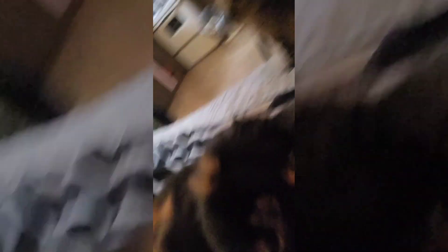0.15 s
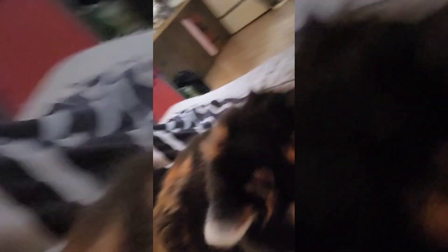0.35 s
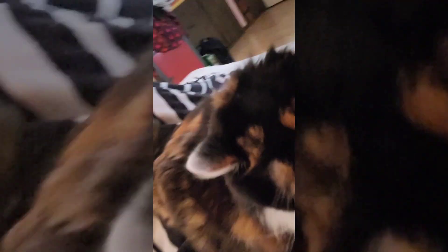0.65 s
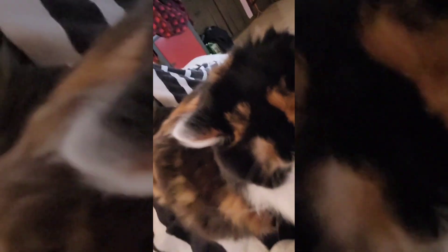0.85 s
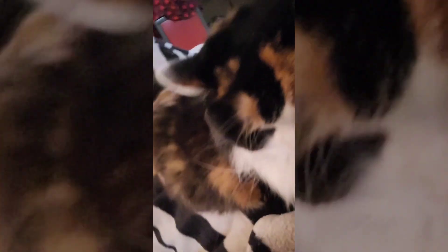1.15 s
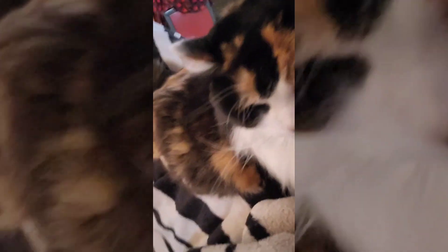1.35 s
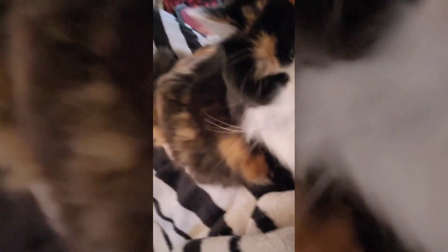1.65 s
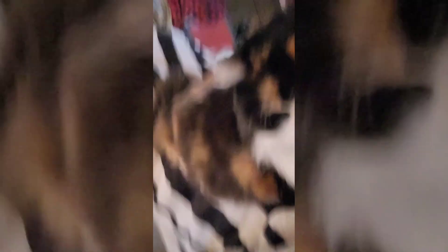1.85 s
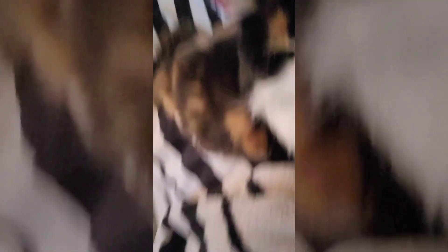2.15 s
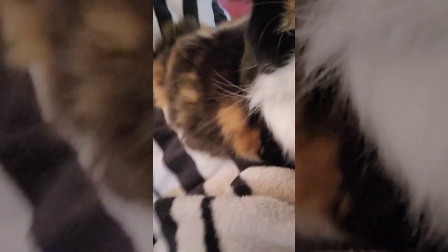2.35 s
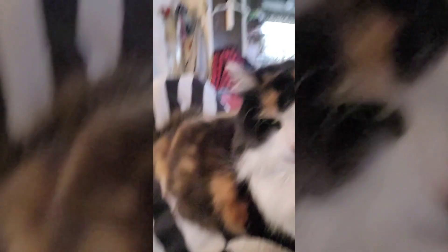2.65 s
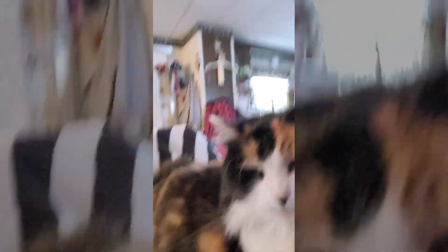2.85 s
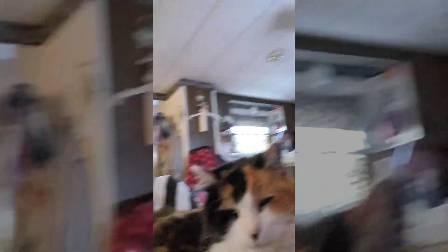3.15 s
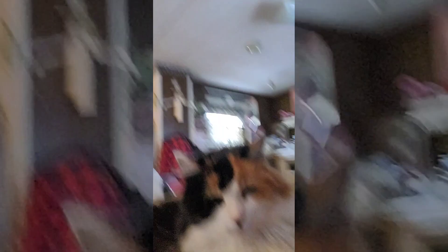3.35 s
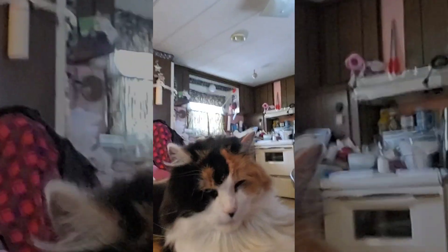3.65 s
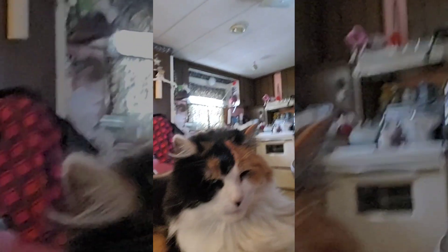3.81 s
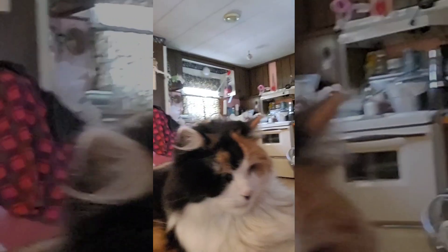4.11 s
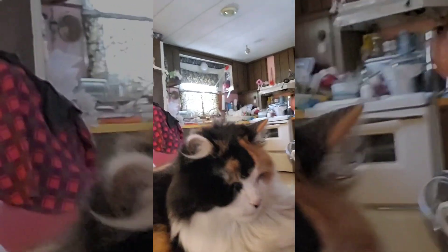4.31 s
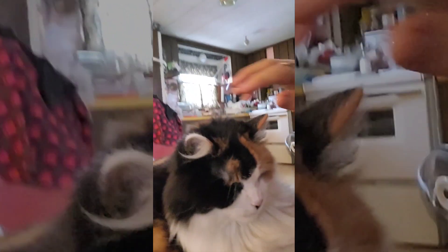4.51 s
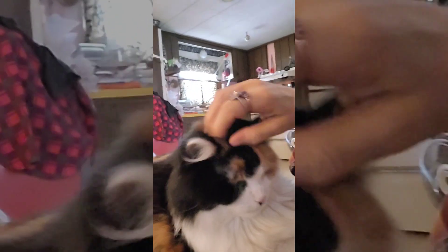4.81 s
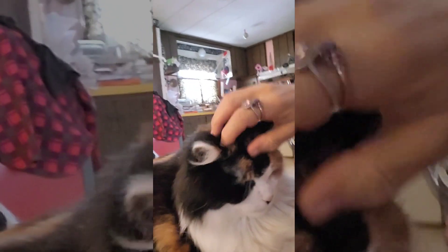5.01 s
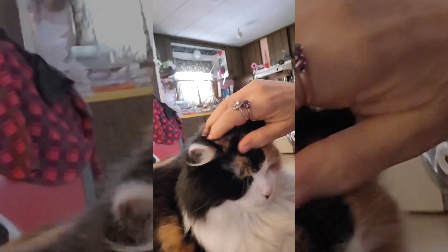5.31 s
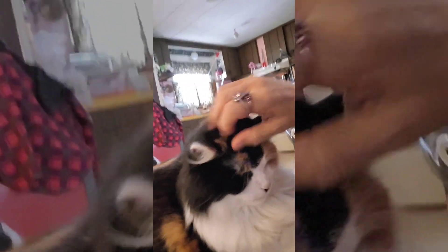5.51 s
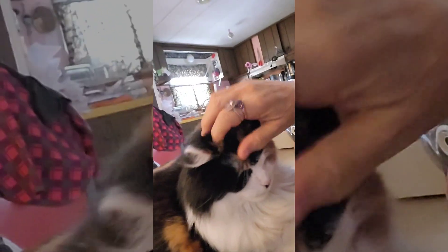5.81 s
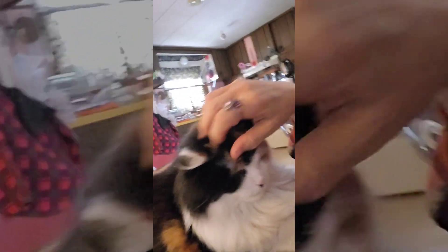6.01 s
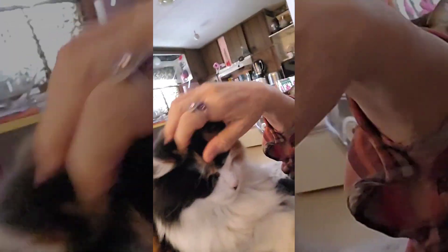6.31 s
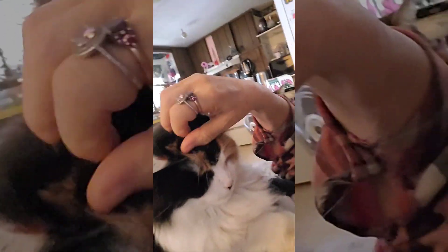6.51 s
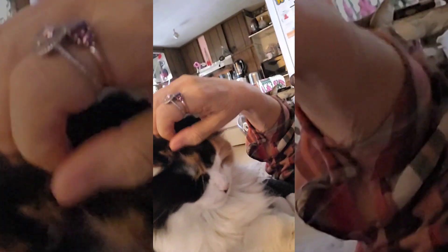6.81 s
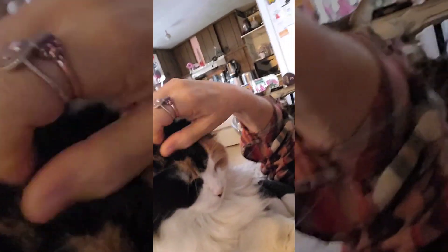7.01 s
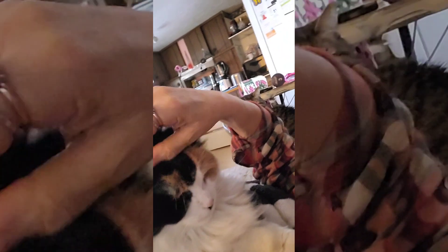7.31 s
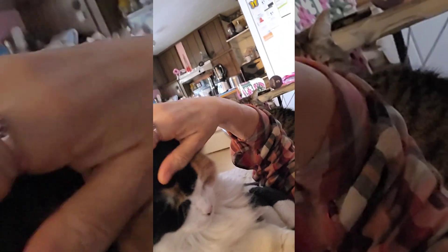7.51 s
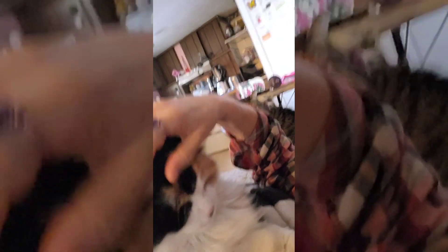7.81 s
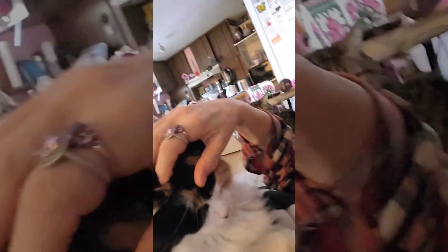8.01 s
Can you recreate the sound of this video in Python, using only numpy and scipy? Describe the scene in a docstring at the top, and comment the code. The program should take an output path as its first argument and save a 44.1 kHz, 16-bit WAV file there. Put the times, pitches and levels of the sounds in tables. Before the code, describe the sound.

Loud bumps and rustling from a moved microphone give way to a close, crackly cat purr with soft fur scratching in a quiet kitchen.

```python
"""A quiet kitchen: a cat purrs on a blanket close to a hand-held recorder with a left and a right port.
At first the recorder is moved: ringing bursts knock its case and shaped noise rubs cloth on it.
Later the purr is bare: noise flutters through chest, mouth and nose, and impulses click in chest and mouth.
Noise puffs mark the turns of breath, a gliding sine whistles in the nose, and fingers scratch fur.
Behind it all lies uneven noise from the house and the microphones."""
import sys
import numpy as np
from scipy import signal
from scipy.fft import rfft, irfft, next_fast_len
from scipy.io import wavfile
from scipy.ndimage import map_coordinates

SR = 44100
rng = np.random.default_rng(int(sys.argv[2]) if len(sys.argv) > 2 else 0)


def to_wav(s):
    """Save 16-bit WAV."""
    ch = np.atleast_2d(s).T  # columns
    pcm = np.round(np.clip(ch, -1, 1) * 32767)  # PCM
    wavfile.write(sys.argv[1], SR, pcm.astype(np.int16))


N = 359856

# Levels in the tables are drives in dB, ahead of any filter or port balance in the functions.

# Purr phrases. Each row: start in seconds, length in seconds, chest level in dB at the start,
# chest level in dB at the end, nose level in dB, share of the upper nose resonance (0-1).
PURR_PHRASES = [(3.264, 0.29, -68, -57, -84.5, 0.5), (3.732, 0.25, -57, -85, -99.5, 0.45),
                (4.2, 0.52, -54, -57, -73, 0.71), (4.799, 0.11, -62.5, -69, -83, .4),
                (5.06, 0.25, -55.5, -69, -74.5, 1), (5.401, 0.068, -68, -63.5, -78.5, 0.85),
                (5.626, 0.25, -67, -73.5, -79.5, 0.3), (6.149, 0.374, -57.5, -59.5, -72.5, 0.2),
                (6.878, 0.63, -67.5, -65.5, -85.5, 0.4), (7.53, 0.21, -62, -63.5, -89, 0),
                (7.738, 0.41, -51, -58, -69.5, 0.45)]
# Sharp closures of the throat. Each row: time in seconds, mouth level in dB, chest level in dB.
THROAT_CLICKS = [(3.586, -37, -24), (3.735, -40.5, -28.5), (4.224, -53, -20), (4.251, -23, -8.5),
                 (4.345, -38, -30), (4.45, -36.5, -29.5), (4.514, -36, -35), (4.945, -39, -31.5),
                 (5.059, -50, -24), (5.08, -44, -23.5), (5.094, -24.5, -15), (5.111, -32.5, -26),
                 (5.143, -35, -21.5), (5.176, -35, -20.5), (5.235, -51, -21), (5.264, -55, -34),
                 (5.297, -55, -38.5), (5.483, -51.5, -27.5), (5.548, -46, -28.5), (5.626, -41, -39),
                 (6.147, -37.5, -25), (6.177, -46, -18.5), (6.249, -30, -14.5), (6.376, -39, -24),
                 (6.509, -38.5, -24.5), (6.775, -38, -44), (6.908, -41.5, -27), (6.967, -44, -37),
                 (6.996, -42, -30.5), (7.148, -44, -34.5), (7.185, -38, -27.5), (7.203, -33.5, -23),
                 (7.267, -38.5, -25), (7.389, -35, -26), (7.418, -33, -23.5), (7.635, -38, -24.5),
                 (7.737, -55, -20.5), (7.77, -36, -15), (7.805, -30, -25), (7.865, -31, -15.5),
                 (7.905, -45, -19), (7.963, -33.5, -17.5), (8, -49, -20), (8.037, -40, -23),
                 (8.097, -34.5, -31)]
# Purr carried through the blanket into the case. Each row: time in seconds, level in dB.
BLANKET_TOUCH = [(3.2, -64.5), (3.7, -56), (4.1, -65), (4.7, -65.5), (5.1, -67.5)]
# Resonances of the cat's chest, mouth and nose. Each row: centre in Hz, width in Hz, level in dB.
CHEST_MODES = [(161.5, 180, -10), (286, 77.5, 1.5), (457.2, 141.6, -6)]
MOUTH_MODES = [(1090, 260, 0), (1750, 300, -8), (2600, 900, -16)]
NOSE_MODES = [(4390, 230, 0), (5084, 890, 0)]
# Turns of the cat's breath. Each row: start in seconds, length in seconds, level in dB,
# lower airway resonance in Hz, upper airway resonance in Hz.
BREATH_PUFFS = [(3.82, 0.076, -64, 1040, 2000), (4.729, 0.064, -69.5, 1021, 1660),
                (5.64, 0.089, -70.5, 1610, 2170), (6.551, 0.058, -66.5, 1000, 1650),
                (7.464, 0.09, -70, 1600, 2010)]
# Whistle in the cat's nose. Each row: time in seconds, pitch in Hz, level in dB.
NOSE_WHISTLE = [(5.52, 8000, -80.5), (5.562, 8679, -81.5), (5.66, 8280, -74.5), (5.86, 8480, -83.5),
                (5.97, 8124, -89)]
# Colour of the puff. Each row: frequency in Hz, density in dB per Hz.
PUFF_SPECTRUM = [(500, 2.5), (1000, 1), (1700, -7), (3000, -4.5), (4500, -2.5), (6500, -17), (10000, -24)]
# Fingers through fur. Each row: centre of the stroke in seconds, level in dB.
FUR_STROKES = [(4.612, -70.5), (4.712, -69), (4.947, -76), (5.182, -70), (5.369, -72.5), (5.479, -69),
               (5.63, -66.5), (5.778, -68), (5.993, -68), (6.139, -74), (6.279, -64.5), (6.415, -67.5),
               (6.553, -63.5), (6.825, -64.5), (7.098, -68), (7.263, -74), (7.372, -68), (7.542, -74),
               (7.684, -72), (7.801, -65), (7.946, -62.5), (8.078, -74)]
# Colour of the fur. Each row: frequency in Hz, density in dB per Hz.
FUR_SPECTRUM = [(1500, -26), (4000, -11), (7500, -3), (10500, -12), (14000, -2.5), (15500, -2)]
# Knocks on the case. Each row: time in seconds, crack level in dB, body level in dB,
# treble level in dB, share of the upper body mode (0-1).
CASE_KNOCKS = [(0.063, -58, -24, -67, 0.76), (0.105, -75, -27, -75, 0), (0.803, -69, -31.5, -75, 0.3),
               (0.441, -42.5, -27.5, -50, 0), (1.149, -61.5, -33, -62.5, 0.3), (1.787, -63, -35, -76, 0.75),
               (0.16, -77, -31.5, -42, 0.6), (0.194, -46, -36, -42.5, 0.63),
               (0.317, -19.5, -8, -17.5, 0.28), (0.399, -17.5, -11.5, -17, 0.85),
               (0.551, -21, -8, -29.5, 0.84), (0.57, -47.5, -21.5, -58.5, 0.4),
               (0.636, -34.5, -20, -52.5, 0.6), (0.67, -36.5, -11, -42, 0.65),
               (0.762, -45.5, -22.5, -48, 0.37), (0.879, -47, -40, -54, 0.78),
               (0.914, -43.5, -15.5, -65, 0.13), (0.973, -36.5, -19.5, -77, 0.66),
               (1.018, -33.5, -15, -25.5, 0.96), (1.081, -32.5, -12.5, -39, 0.2),
               (1.184, -19.5, -8, -26.5, 0.17), (1.192, -32, -3.5, -21.5, 1),
               (1.329, -28.5, -12.5, -27, 0.51), (1.352, -41.5, -19, -55.5, 0.6),
               (1.407, -43.5, -27.5, -43.5, 0.36), (1.418, -42, -28, -67, 0.3),
               (1.486, -38.5, -18, -36, 0.52), (1.629, -39, -23.5, -44.5, 0.6),
               (1.66, -24, -11.5, -34, 0.6), (1.698, -38.5, -19, -27, 1), (1.871, -28.5, -15, -28.5, 0.82),
               (1.881, -15.5, -4.5, -23.5, 0.26), (2.041, -30.5, -7.5, -30, 0.22),
               (2.064, -40, -13, -60, 0.7), (2.206, -35.5, -13.5, -49, 0.71),
               (2.262, -32.5, -18.5, -32.5, 0.83), (2.326, -34, -13, -30.5, 0.28),
               (2.568, -33, -20.5, -35.5, 0.48), (2.675, -28.5, -19.5, -37.5, 1),
               (2.981, -39, -19.5, -51, 0.6), (3.066, -32, -20.5, -44, 0.78), (3.151, -70, -22, -83, 0.78),
               (3.432, -29.5, -15, -59, 1), (0.711, -56, -29, -61, 0.7), (2.834, -54.5, -32, -66, 0.03)]
# Low modes of the case, strong at the left port. Each row: frequency in Hz, 60 dB decay in seconds.
BODY_MODES = [(292, 0.036), (460, 0.033)]
# Resonances of the case and of the ports. Each row: centre in Hz, width in Hz, level in dB.
CASE_MODES = [(530, 300, 7), (1047, 250, 8.5), (1800, 640, 2.5), (2410, 3200, -9)]
PORT_MODES = [(3640, 1100, -5.5), (4750, 590, 1), (5800, 1200, -7), (8000, 1300, -6.5)]
# Cloth dragged over the case. Each row: start in seconds, end in seconds, thud level in dB,
# rasp level in dB, fizz level in dB, left-right difference of rasp and fizz in dB.
CLOTH_SCRAPES = [(0.226, 0.366, -43, -58, -49.5, -6), (0.382, 0.417, -40.5, -58, -60, -9),
                 (1.173, 1.239, -43, -59, -63, -1), (1.32, 1.453, -58, -67.5, -79.5, -10),
                 (1.83, 1.962, -63, -47.5, -57.5, -5), (1.917, 1.987, -38.5, -46, -57, -14),
                 (2.044, 2.067, -27.5, -44, -42.5, -6), (2.176, 2.227, -52, -46.5, -49.5, 1),
                 (2.286, 2.323, -38.5, -57.5, -69, -16), (2.323, 2.343, -36.5, -41, -39.5, -8),
                 (2.386, 2.491, -50, -49, -69.5, -30), (2.49, 2.586, -70, -55, -65.5, -25),
                 (2.59, 2.592, -38.5, -43, -56, -7), (2.69, 2.776, -38, -53.5, -68, -8.5),
                 (2.896, 3.009, -48.5, -67, -66.5, -8), (3.048, 3.198, -52, -69.5, -84, -4),
                 (3.414, 3.533, -67, -67.5, -71.5, -6)]
# Light contact between scrapes. Each row: time in seconds, thud level in dB, rustle level in dB.
LIGHT_RUB = [(0, -39.5, -41.5), (.7, -53, -73), (1.5, -48.5, -64), (2.05, -52.5, -62.5),
             (2.6, -44.5, -55.5), (2.9, -51, -63), (3.2, -59.5, -83.5), (4.8, -64.5, -84)]
# Brief dips in the level of the light rub. Each row: centre in seconds, half length in seconds.
RUB_DIPS = [(0.108, 0.11), (0.846, 0.018), (1.302, 0.024), (1.776, 0.032), (3.225, 0.025)]
# Air pumped at the ports by the moving hand. Each row: time in seconds, level in dB.
HAND_SWAY = [(0, -52.5), (1.7, -64), (2.1, -50.5), (2.8, -55.5), (3.3, -69.5), (4.6, -63), (5.3, -72),
             (8.16, -76.5)]
# Colour of that air. Each row: frequency in Hz, density in dB per Hz.
SWAY_SPECTRUM = [(20, -12.5), (55, -3.5), (110, -3.5), (200, -13), (400, -48.5)]
# Colours of the rasp and the fizz of cloth. Each row: frequency in Hz, density in dB per Hz.
RASP_SPECTRUM = [(500, -2.5), (900, -1), (2000, -10), (3600, -7), (5000, -12), (6500, -28.5), (9000, -44)]
FIZZ_SPECTRUM = [(4000, -33.5), (6000, -10.5), (7800, -1), (9500, -13), (12000, -21), (15500, -6.5)]
# Background level. Each row: time in seconds, level in dB.
BACKGROUND_LEVEL = [(0, -76), (3.2, -65.5), (4.1, -67.5), (4.7, -65.5), (8.16, -63)]
# Colour of the background. Each row: frequency in Hz, density in dB per Hz.
ROOM_SPECTRUM = [(20, -15.5), (58, 2.5), (130, -9.5), (300, -10.5), (550, -22), (900, -27), (2000, -29),
                 (4300, -30), (5800, -34.5), (7800, -27.5), (10500, -35), (14500, -30.5)]
# Likeness of the ports in the room. Each row: frequency in Hz, left-right correlation.
ROOM_LIKENESS = [(60, 0.93), (200, 0.18), (600, 0.0033)]
# Treble balance of the ports. Each row: frequency in Hz, left-right difference in dB.
PORT_BALANCE = [(5000, 1.5), (8000, -16.5), (12000, 5)]

# Purr
CLOSURES_HZ = 30.5  # usual beat of the throat, rounded to fit between sharp closures
JITTER_S, CLOSE_S = 0.0025, 0.005  # scatter of the closures, rise time of one flutter
ATTACK_S, RELEASE_S = 0.014, 0.098  # phrase fade in, and time of a 20 dB fall after the phrase
LEAK, LEAK_GROWS = 0.27, 0.2  # flutter between closures at -60.5 dB chest, dB more per dB gentler
SHARP_SNAP_DB = 32.5  # chest level of a sharp closure, over the purr, that leaves its flutter unchanged
FLUTTER_FOLLOWS = 0.46  # dB of flutter per dB of sharp closure above or below that level
SNAP_DB, SNAP_CHEST_DB, SNAP_SCATTER_DB = -6, 12, 3.5  # plain snaps against the purr: mouth, chest, scatter
REBOUND_S, REBOUND_DB = 0.0085, -7  # the folds bounce and strike once more
AIRWAY_WIDTH_HZ = 170  # width of the puff resonances

# Handling
SHOVE_DB = -30.5  # push of the whole case, against the body level
SHEEN_MODE = (13700, 8500, 0)  # top of a knock: centre Hz, width Hz, dB
SHEEN_DB, SHEEN_GROWS = -15, 0.35  # against a treble of -25 dB, and extra dB per dB of treble
DIP_DB = -21  # level at the middle of a dip, against the light rub
SCRAPE_FADE_S = 0.018  # the cloth settles after a scrape
CRACKLE_PER_S, CRACKLE_DB = 260, -3.5  # single threads snapping, against the rasp

# Band limits
HISS_TOP_HZ = 15500
TOP_HZ, EDGE_HZ = 16530, 500  # end and width of the final roll-off


def amp(db):
    """Amplitude for a level in dB."""
    return 10 ** (np.asarray(db) / 20)


def unit(x):
    """x scaled to an rms of 1 along time."""
    return x / np.sqrt(np.mean(x ** 2, axis=-1, keepdims=True) + 1e-20)


def along(points, hz):
    """Value at hz between (Hz, value) points on a log frequency axis."""
    f, v = np.transpose(points)
    return np.interp(np.log(hz + 1), np.log(f + 1), v)


def curves(rows, outside=-120):
    """One value per sample for each column after the time; the outside value beyond the rows."""
    s, *cols = np.transpose(rows)
    return [np.interp(np.arange(N) / SR, s, c, outside, outside) for c in cols]


def wobble(rate):
    """A smooth random curve for each port, with rate knots a second."""
    knots = rng.standard_normal((2, int(N * rate / SR) + 4))
    steps = np.arange(0, N + 16, 16)
    smooth = [map_coordinates(k, [steps * rate / SR]) for k in knots]
    return np.array([np.interp(np.arange(N), steps, curve) for curve in smooth])


def filtered(x, response):
    """x through a complex response of frequency."""
    m = next_fast_len(N + SR // 4)
    return irfft(rfft(x, m) * response(np.fft.rfftfreq(m, 1 / SR)), m)[..., :N]


def resonant(x, *stages):
    """x through sets of causal resonances in turn, each scaled so that white noise keeps its rms."""
    def shape(f, modes):
        total = 0
        for k, (centre, width, db) in enumerate(modes):
            sign = (-1) ** k  # neighbours alternate in polarity
            total = total + sign * amp(db) * 1j * f * width / (centre * centre - f * f + 1j * f * width)
        return total

    grid = np.linspace(0, SR / 2, 4096)
    scale = np.prod([np.sqrt(np.mean(abs(shape(grid, modes)) ** 2)) for modes in stages])
    return filtered(x, lambda f: np.prod([shape(f, modes) for modes in stages], axis=0) / scale)


def hiss(spectrum):
    """Unrelated noise at each port, rms 1, with no energy over the top of the hiss."""
    noise = rng.standard_normal((2, N))
    return unit(filtered(noise, lambda hz: amp(along(spectrum, hz)) * (hz < HISS_TOP_HZ)))


def panned(db):
    """Gains of the two ports for a left-right difference."""
    return amp(np.array([db / 2, -db / 2]))


def purr():
    """The throat shuts about thirty times a second, each time a rough flutter in chest, mouth and nose."""
    chest_db, nose_db, upper, edge_db = phrases()
    times, plain = closures()
    t = np.arange(N) / SR
    last = (np.searchsorted(times, t, 'right') - 1).clip(0)  # latest closure at each sample
    s, mouth_db, thump_db = np.transpose(THROAT_CLICKS)
    at = (s * SR).astype(int) + 40  # just past each sharp closure

    # a harder sharp closure lets a stronger flutter follow
    size_db = rng.normal(0, 1.5, 400)
    excess_db = thump_db - chest_db[at] - SHARP_SNAP_DB
    size_db[last[at]] = np.clip(FLUTTER_FOLLOWS * excess_db, -6, 6)
    size = amp(size_db)[last]
    u = (t - times[last]) / CLOSE_S
    leak = np.clip(LEAK * amp(-LEAK_GROWS * (chest_db + 60.5)), 0, .5)
    gate = size * u * np.exp(1 - u) + leak
    gate = gate * amp(2.5 * wobble(120)[0])  # the folds slap unevenly within a closure
    flutter = gate * rng.standard_normal((4, N))

    chest = unit(resonant(flutter[0], CHEST_MODES, [(253.7, 2600, 0)]))
    deep = unit(resonant(flutter[0], [(147, 54, 0)], [(148, 110, 0)]))
    chest = chest + amp(-.6 * (chest_db + 70.5)).clip(0, 1.5) * deep  # a gentle purr sits lower in the body
    mouth_drive = flutter[0] + 18.0 * flutter[1:3] * [[1], [-1]]
    mouth = unit(resonant(mouth_drive, MOUTH_MODES, MOUTH_MODES))
    airy = flutter[2:] * amp(3 * wobble(30))
    low, high = (unit(resonant(airy, [mode], [(4940, 2200, 0)])) for mode in NOSE_MODES)
    nose = np.sqrt(1 - upper) * low + np.sqrt(upper) * high
    case = unit(resonant(flutter[3], [(440, 87, 0)], [(524, 160, 0)])) * amp([[4], [-8]])
    touch = amp(curves(BLANKET_TOUCH)[0] + edge_db) * case

    # plain closures snap with the purr level; sharp ones have their own levels
    shut = (np.diff(last, prepend=0) == 1) & plain[last]
    snaps = -1.0 * shut * amp(chest_db + SNAP_SCATTER_DB * wobble(37)[0])
    taps, thumps = amp(SNAP_DB) * snaps, amp(SNAP_CHEST_DB) * snaps
    taps[at], thumps[at] = -amp(mouth_db), -amp(thump_db)
    thumps = thumps + amp(REBOUND_DB) * np.roll(thumps, round(REBOUND_S * SR))

    def soft(corner_hz):
        return lambda hz: 1 / (1 + 1j * hz / corner_hz) ** 2  # flesh rounds the closure

    mouth_clicks = resonant(filtered(taps, soft(1600)), MOUTH_MODES) * amp([[1.5], [-1.5]])
    chest_clicks = resonant(filtered(thumps, soft(460)), CHEST_MODES)
    voice = amp(chest_db) * (chest * panned(1.7)[:, None] + amp(-16.0) * mouth)
    return voice + amp(nose_db) * nose + mouth_clicks + chest_clicks + touch


def phrases():
    """Chest and nose levels in dB, nose colour and the fade at the edges in dB, phrase by phrase."""
    t = np.arange(N) / SR
    columns = np.transpose(PURR_PHRASES)
    current = (np.searchsorted(columns[0], t + ATTACK_S) - 1).clip(0)
    start, length, first_db, last_db, nose_db, upper = columns[:, current]
    since = t - start
    attack_db = 20 * np.log10(np.clip(1 + since / ATTACK_S, 1e-3, 1))
    edge_db = attack_db - 20 * np.clip(since - length, 0, None) / RELEASE_S
    chest_db = first_db + (last_db - first_db) * np.clip(since / length, 0, 1)
    return chest_db + edge_db, nose_db + edge_db, np.clip(upper, 0, 1), edge_db


def closures():
    """Times at which the throat shuts: sharp closures with a jittered beat between, and which are plain."""
    marks = np.sort(np.r_[0, np.transpose(THROAT_CLICKS)[0], N / SR])
    steps = np.cumsum(np.r_[0, np.maximum(1, np.round(np.diff(marks) * CLOSURES_HZ))])
    beat = np.arange(steps[-1])
    plain = ~np.isin(beat, steps)
    scatter = JITTER_S * rng.standard_normal(400)[:len(beat)] * plain
    return np.interp(beat, steps, marks) + scatter, plain


def breath():
    """Soft puffs where the breath turns, coloured by airway resonances, and a thin sine whistle in the nose."""
    t = np.arange(N) / SR
    puffs, air, swirl = np.zeros((2, N)), hiss(PUFF_SPECTRUM), amp(5.6 * wobble(54))
    for s, length, db, *airway_hz in BREATH_PUFFS:
        at = slice(round(s * SR), round(s * SR) + SR // 4)
        since = t[at] - s
        ring = 0
        for hz in airway_hz:
            b, a = signal.iirpeak(hz, hz / AIRWAY_WIDTH_HZ, SR)
            ring = ring + signal.lfilter(b, a, air[:, at])
        shape = np.clip(since / 0.012, 0, 1) * np.exp(-(since / length) ** 3) * swirl[:, at]
        puffs[:, at] += amp(db) * shape * (air[:, at] + unit(ring))
    hz, db = curves(NOSE_WHISTLE)
    level = np.sqrt(2) * amp(db + 1.2 * wobble(27)[0])
    phase = 2 * np.pi * np.cumsum(hz + 40 * wobble(150)[0]) / SR
    return puffs + level * np.sin(phase) * amp([[-3], [3]])


def scratching():
    """Each finger stroke through the fur is a soft swell of high rustle."""
    t = np.arange(N) / SR
    swells = sum(amp(db) * np.exp(-((t - s) / 0.043) ** 2) for s, db in FUR_STROKES)
    return swells * unit(amp(4.8 * wobble(160)) * hiss(FUR_SPECTRUM))


def knocks():
    """Each knock is a short scrape that shakes the case: a crack at both ports, then the low modes ring."""
    crack, treble, sheen, body, shove = np.zeros((5, 2, N + SR // 8))
    t = np.arange(SR // 8) / SR
    u = t / 0.0029
    envelope = u * np.exp(1 - 1.28 * u ** 1.33) + 0.28 * np.exp(-u / 3)
    for s, db, body_db, treble_db, upper in CASE_KNOCKS:
        at = slice(round(s * SR), round(s * SR) + len(t))
        scrape = unit(rng.standard_normal((3, len(t))) * envelope) / 8
        crack[:, at] += amp(db) * scrape[:2]

        upper = np.clip(upper, 0, 1)
        modes_driven = []
        for gain, (hz, t60) in zip((1 - upper, upper), BODY_MODES):
            ring = gain * amp(-60 * t / t60) * np.sin(2 * np.pi * hz * rng.normal(1, 0.028) * t)
            modes_driven.append(signal.fftconvolve(scrape[2], ring)[:len(t)])
        low, high = modes_driven
        push = np.array([low + high, amp(-16.5) * low - amp(-18.5) * high])
        body[:, at] += amp(body_db) * push / abs(push).max()

        snap = unit(scrape[1::-1] * (np.exp(-u) + 0.25)) / 8  # the treble comes first and dies first
        treble[:, at] += amp(treble_db) * snap
        sheen[:, at] += amp(treble_db + SHEEN_DB + SHEEN_GROWS * (treble_db + 25)) * snap
        # the whole case is pushed through the air: opposite pressure at the two ports
        shove[:, at] += amp(body_db + SHOVE_DB) * u * np.exp(-u / 2) * [[-.35], [1]]

    def body_band(hz):
        return (1j * hz / (150 + 1j * hz) / (1 + 1j * hz / 1500)) ** 2

    cracks = resonant(crack[:, :N], CASE_MODES, [(1155, 2060, 0.011), (2130, 3790, 0.0016)])
    tops = resonant(sheen[:, :N], [SHEEN_MODE], [SHEEN_MODE]) + resonant(treble[:, :N], PORT_MODES)
    return cracks + tops + filtered(body[:, :N], body_band) + resonant(shove[:, :N], [(68.4, 22, 0)])


def handling():
    """Cloth catches and slips on the case; noise through its low modes gives bumps; the hand pumps air."""
    t = np.arange(N) / SR
    dips_db = sum(DIP_DB * np.exp(-((t - s) / half) ** 2) for s, half in RUB_DIPS)
    thud, rustle = amp(curves(LIGHT_RUB) + dips_db)
    thud = thud * unit(amp(7.5 * wobble(32)[0]))
    rasp, fizz = rustle * np.ones((2, 1)), rustle * amp(-7.5) * np.ones((2, 1))
    for start, end, thud_db, rasp_db, fizz_db, pan_db in CLOTH_SCRAPES:
        at = slice(max(round(start * SR), 0), round(end * SR) + SR // 10)
        rise = np.sin(np.pi / 2 * np.clip(2 * (t[at] - start) / (end - start), 0, 1))
        settling = np.clip(t[at] - (start + 3 * end) / 4, 0, None)  # from three quarters of the way
        stroke = rise * np.exp(-(settling / SCRAPE_FADE_S) ** 2)
        thud[at] += amp(thud_db) * stroke
        rasp[:, at] += amp(rasp_db) * panned(pan_db)[:, None] * stroke
        fizz[:, at] += amp(fizz_db) * panned(pan_db)[:, None] * stroke

    grip, slip = amp(1.5 * wobble(70) + 4 * wobble(400)), amp(2.5 * wobble(90))
    snapping = rng.random((2, N)) < CRACKLE_PER_S / SR
    threads = snapping * rng.standard_normal((2, N)) * amp(1.4 * wobble(60))
    crackle = amp(CRACKLE_DB) * unit(resonant(threads, CASE_MODES + PORT_MODES[:2], [(1500, 5000, 0)]))
    cloth = rasp * (unit(grip * hiss(RASP_SPECTRUM)) + crackle) + fizz * unit(slip * hiss(FIZZ_SPECTRUM))

    modes = [(hz, 150, 0) for hz, _ in BODY_MODES]
    jolts = amp(4 * wobble(90)) * rng.standard_normal((2, N))
    bumps = unit(resonant(jolts, modes, [(347.3, 4100, 0)])) * amp([[5], [-6]])
    sway = unit(amp(1.4 * wobble(5.9)) * hiss(SWAY_SPECTRUM)) * amp([[0], [3]])
    return thud * bumps + cloth + amp(curves(HAND_SWAY)[0]) * sway


def room():
    """Low hum of the house, alike at both ports, and microphone hiss, as noise; bass and treble waver apart."""
    a, b = hiss(ROOM_SPECTRUM)

    def turn(hz):
        return np.arccos(np.clip(along(ROOM_LIKENESS, hz), -1, 1)) / 2

    # the mix of shared and opposed noise sets the likeness of the ports
    mid = filtered(a, lambda hz: np.cos(turn(hz)))
    side = filtered(b, lambda hz: np.sin(turn(hz)))
    both = filtered(np.array([mid + side, mid - side]), lambda hz: panned(along(PORT_BALANCE, hz)))
    bass = filtered(both, lambda hz: 1 / (1 + (hz / 2500) ** 2))
    bass_db, treble_db = [[2.5], [2.2]] * wobble(7.9)
    return amp(curves(BACKGROUND_LEVEL)[0]) * (amp(bass_db) * bass + amp(treble_db) * (both - bass))


def scene():
    """The cat, the fingers in its fur, the handled recorder and the room together."""
    return purr() + breath() + scratching() + knocks() + handling() + room()


def record(dry):
    """The microphones lose the deepest bass; the recorder keeps nothing above its band limit."""
    def response(hz):
        bass_cut = (1j * hz / (35 + 1j * hz)) ** 2
        return bass_cut * np.clip((TOP_HZ - hz) / EDGE_HZ, 0, 1)

    return filtered(dry, response)


dry = scene()
out = record(dry)
to_wav(out)
```